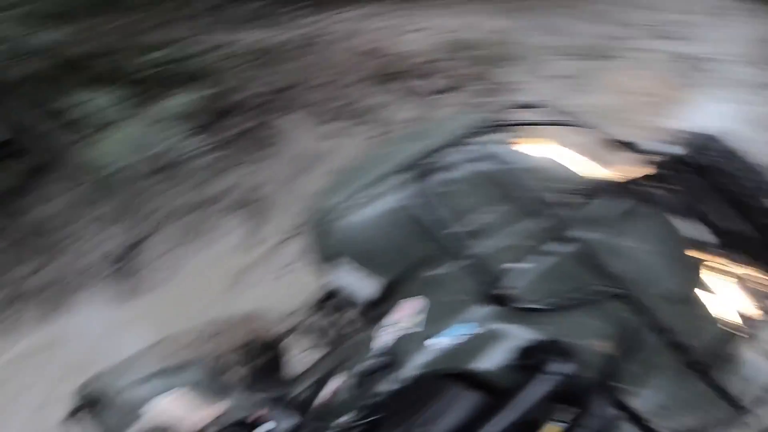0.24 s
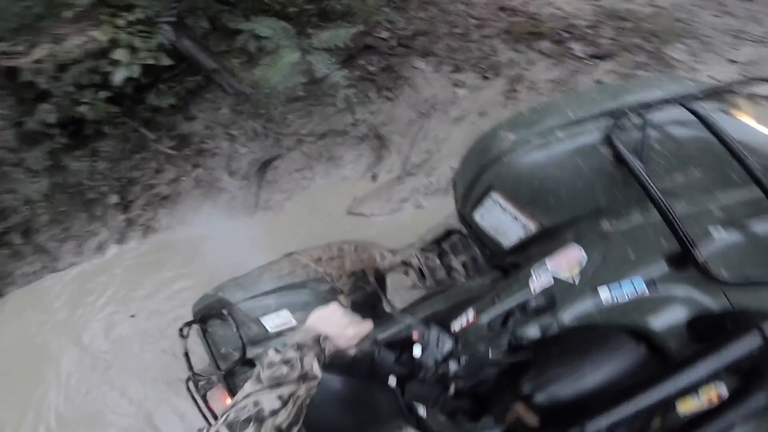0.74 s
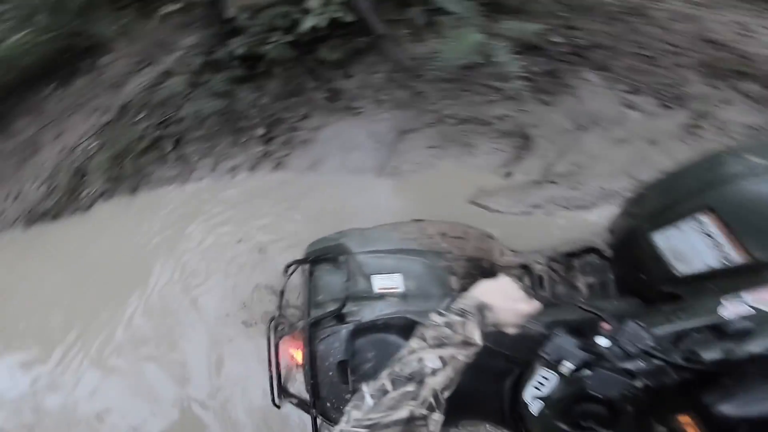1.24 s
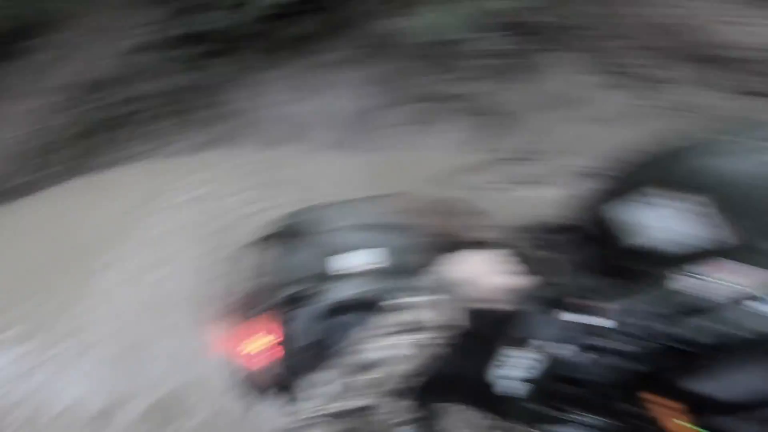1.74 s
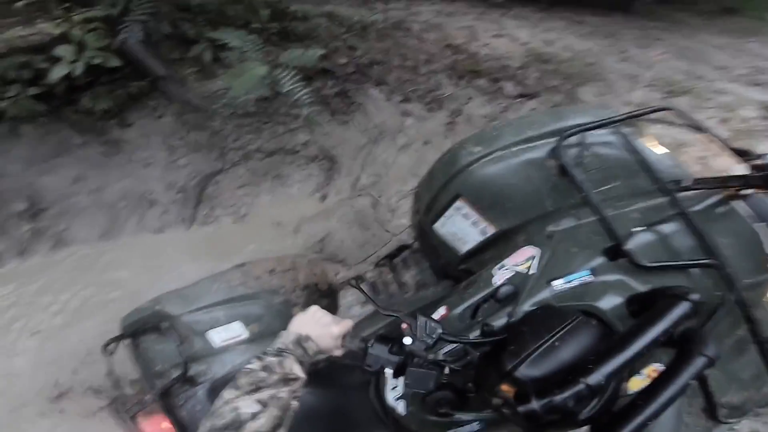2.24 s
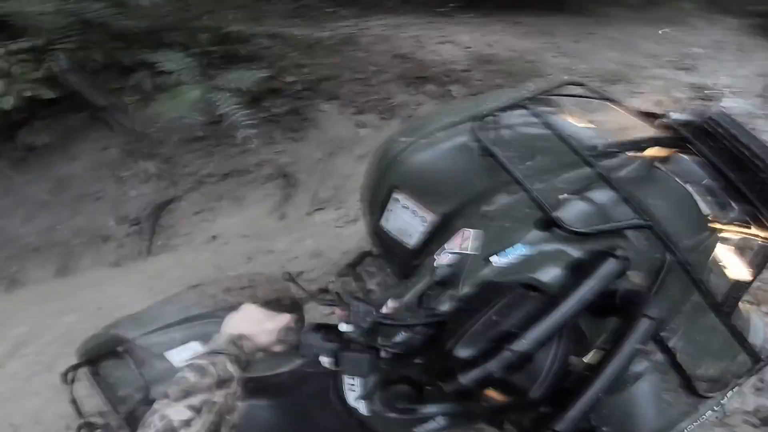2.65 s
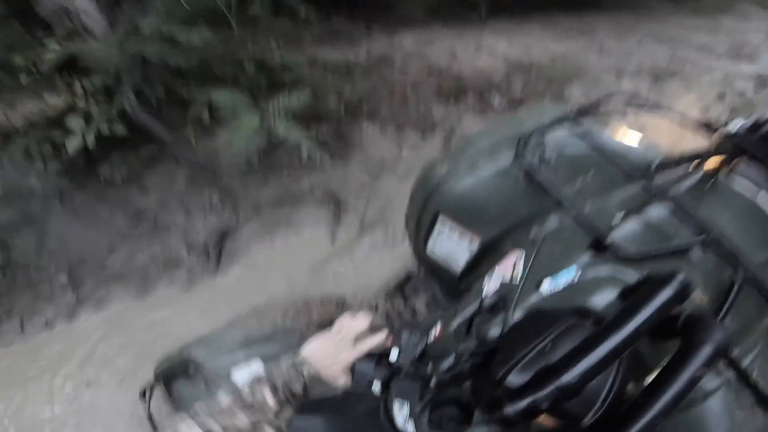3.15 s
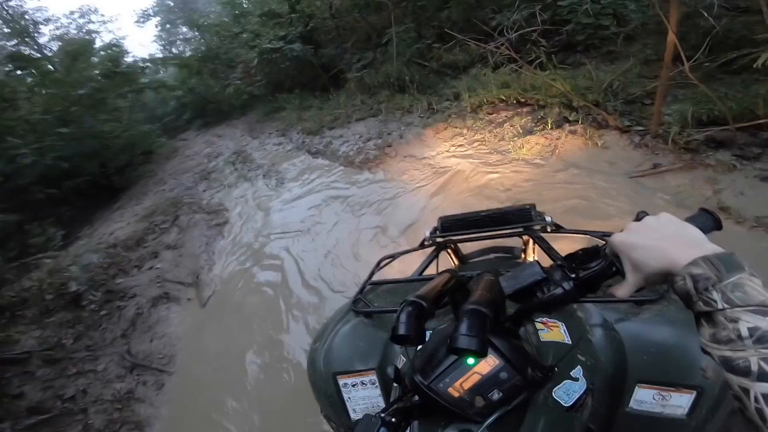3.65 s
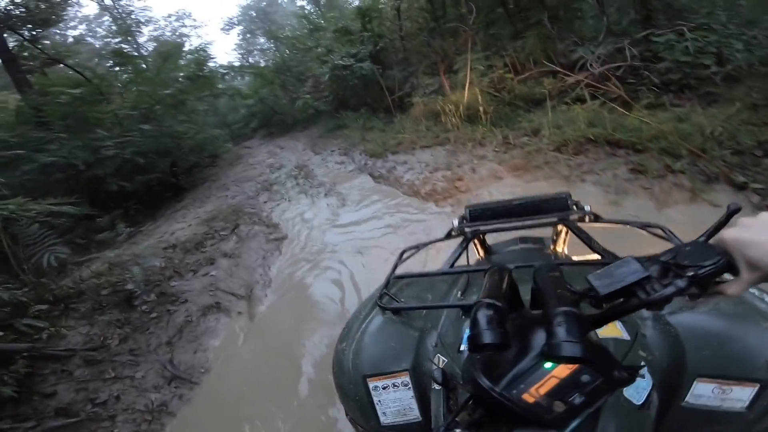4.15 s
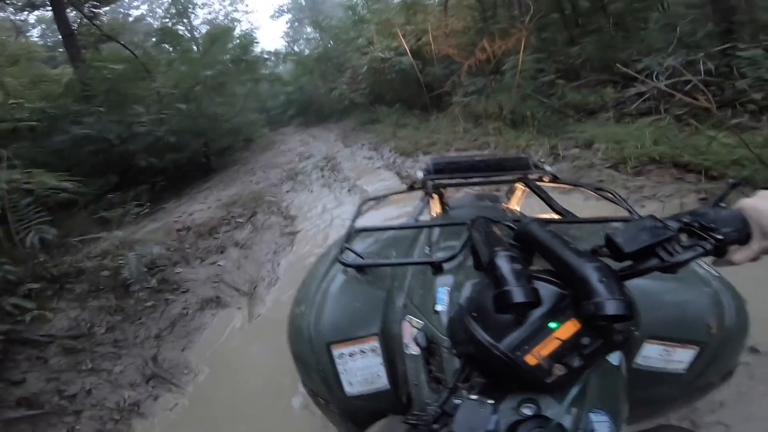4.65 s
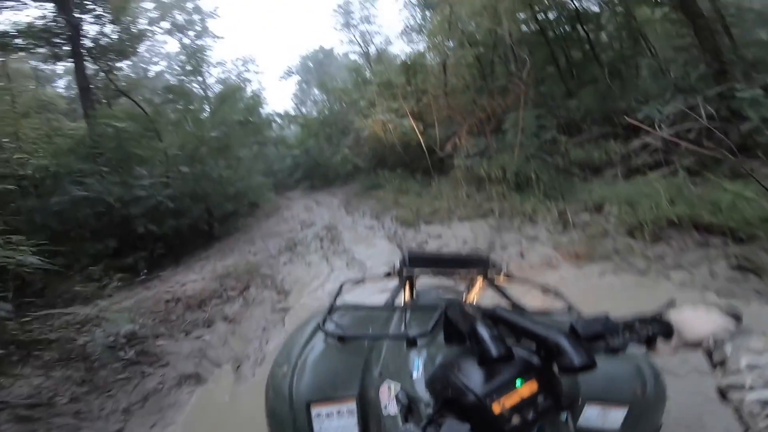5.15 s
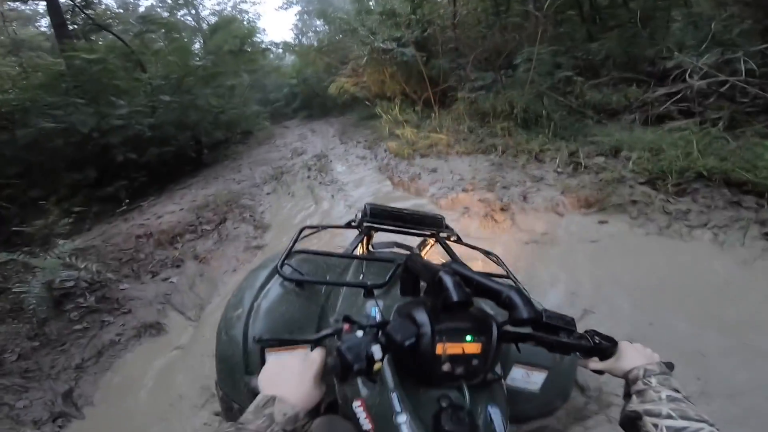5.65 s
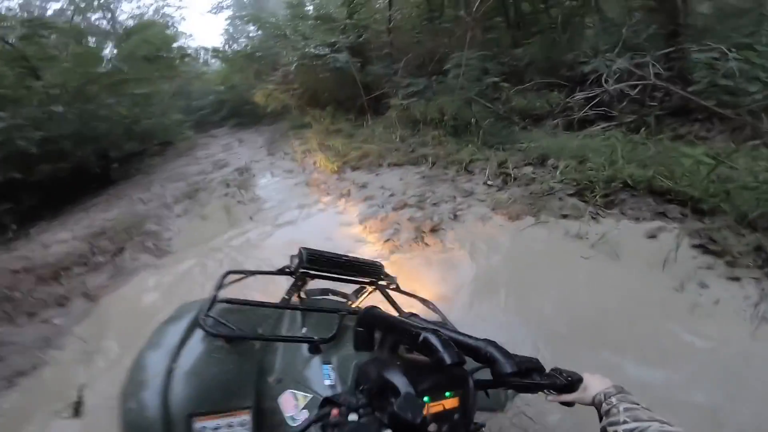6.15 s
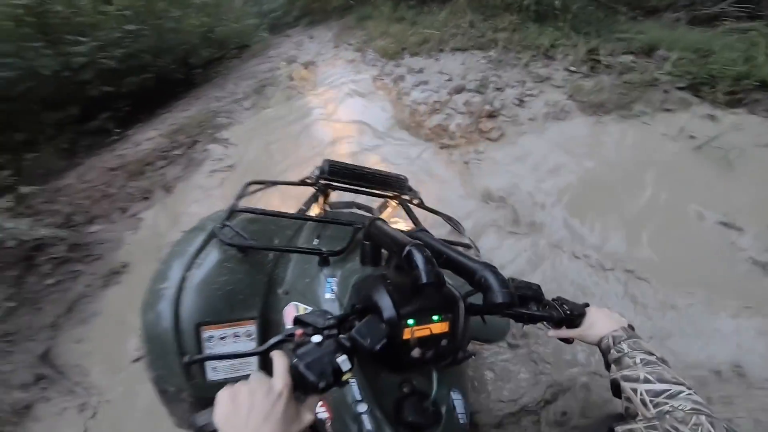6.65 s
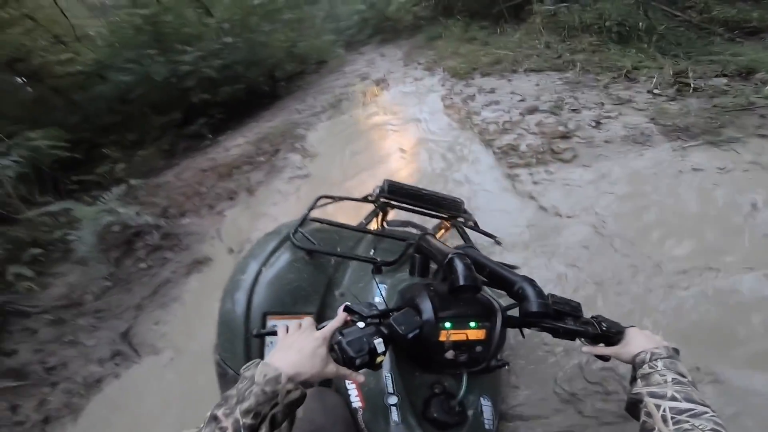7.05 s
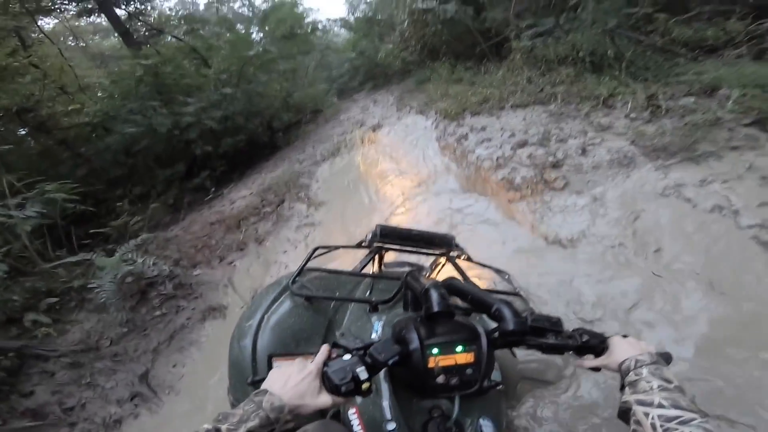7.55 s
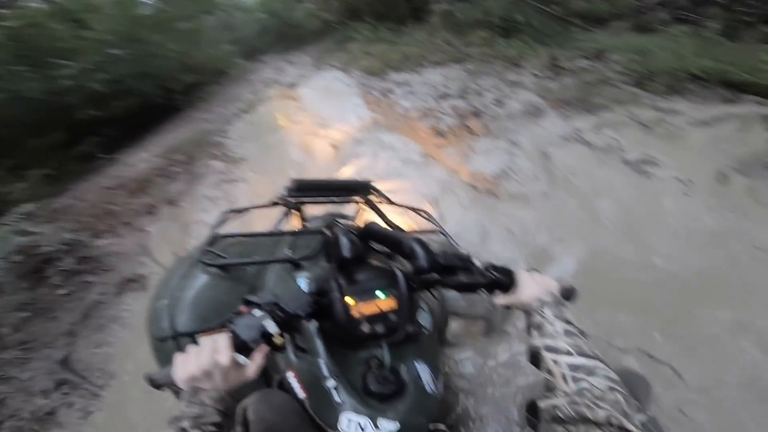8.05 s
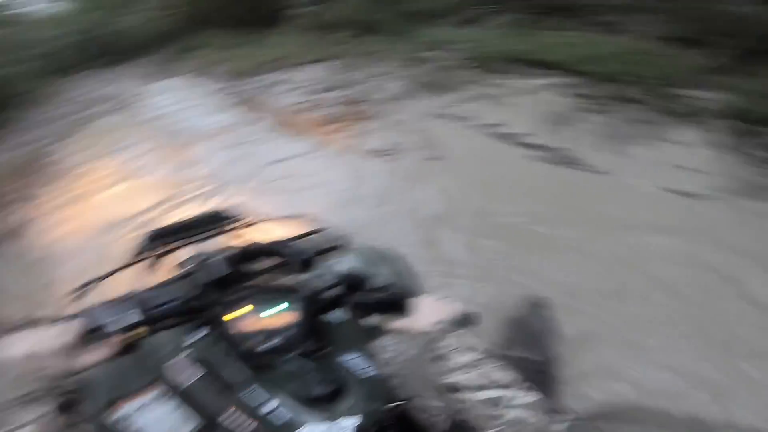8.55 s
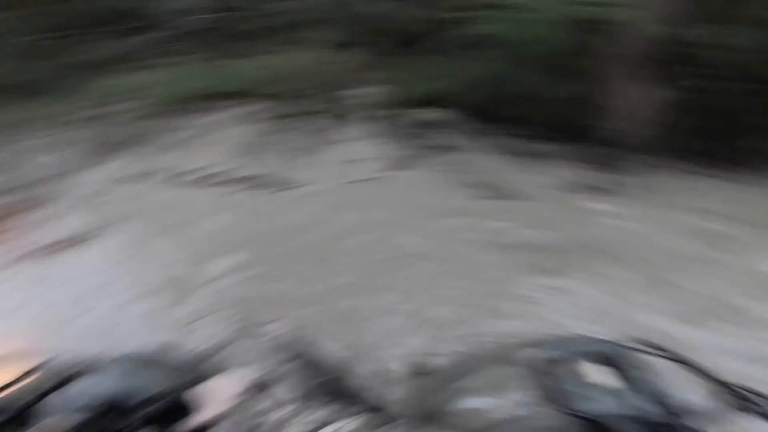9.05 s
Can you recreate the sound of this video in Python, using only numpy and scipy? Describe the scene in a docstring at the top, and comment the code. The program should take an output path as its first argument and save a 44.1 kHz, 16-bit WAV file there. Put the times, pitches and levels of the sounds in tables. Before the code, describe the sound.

Close single-cylinder engine pulses surge, gurgle and idle as a quad works through a flooded rut, with wet slaps and small clicks.

```python
"""A single-cylinder quad creeps through a flooded mud rut, heard close up from the rider's helmet in stereo.
First, head turned, the exhaust: every firing is one thump, barking under throttle, then limping and gurgling
at the waterline. As the head turns forward the intake snorkel takes over, barking on short pushes, then idling
until a last push. Each firing rings pipe resonances and gates bursts of noise. Throughout, coloured noise and
tiny tones make the muddy water at the wheels; decaying sines and noise make the valves and selector clicks."""
import sys
import numpy as np
from scipy import signal
from scipy.fft import rfft, irfft, next_fast_len
from scipy.io import wavfile
from scipy.ndimage import map_coordinates

SR = 44100
rng = np.random.default_rng(int(sys.argv[2]) if len(sys.argv) > 2 else 0)


def to_wav(s):
    """Save 16-bit WAV."""
    ch = np.atleast_2d(s).T  # columns
    pcm = np.round(np.clip(ch, -1, 1) * 32767)  # PCM
    wavfile.write(sys.argv[1], SR, pcm.astype(np.int16))


N = 410130

# engine speed before late firings: time_s, firings_per_s
SPEED = [(0, 18.11), (0.63, 17.82), (2.09, 26.63), (2.31, 15.66), (2.79, 10.79), (3.58, 12.68),
         (3.73, 22.26), (4.18, 24.53), (4.38, 15.38), (4.57, 21.44), (4.74, 17.19), (5.09, 23.51),
         (5.29, 21.42), (5.39, 15.02), (6.36, 11.07), (7.74, 11.77), (7.78, 15.88), (8.0, 18.54),
         (8.65, 19.42), (9.3, 17.4)]
# which pipe the helmet hears: time_s, exhaust_share (1 exhaust, 0 snorkel)
FACING = [(0, 0.95), (2.1, 0.92), (2.25, .8), (3.55, 0.82), (3.7, 0.025)]
# pushes on the thumb throttle: start_s, end_s, release_s, throttle_at_start (0-1), throttle_at_end (0-1)
PUSHES = [(-.1, 2.125, .08, .5, 1), (3.09, 3.65, .05, .2, .27), (3.655, 4.205, .04, .88, 1),
          (4.435, 4.62, .05, .6, .72), (4.8, 5.16, .045, .62, .78), (7.68, 8.85, .75, .43, .35)]
# firings that may be poor: time_s, level_db (below 0 also fires late)
MISFIRES = [(.158, 0), (.496, -1.5), (2.226, -8), (2.408, -11.5), (2.894, -3), (3.566, 0), (5.49, -9)]
# firing strength at idling speed: throttle (0-1), boom_db, honk_db, bark_db, rasp_db, hiss_db
EXHAUST_LOAD = [(0, -23.5, -38, -42.5, -54, -66.5), (.55, -19.5, -27, -39.5, -51, -63),
                (.8, -19.5, -27.5, -35, -45, -53), (1, -18.5, -30.5, -36, -46.5, -51)]
SNORKEL_LOAD = [(0, -24.5, -46, -61, -64, -69.5), (.17, -24, -54.5, -60, -68, -64),
                (.42, -22.5, -38.5, -56, -58, -59), (.7, -22, -37.5, -43.5, -46, -54),
                (1, -23, -43.5, -34, -43, -50.5)]
# what a doubling of engine speed adds: boom_db, honk_db, bark_db, rasp_db, hiss_db
REV_DB = (2.14, 7.95, 7.4, 0.45, 2.1)
# pipe resonances, throttle shut and open: pitch_hz, width_hz (7 dB below the peak), level_db (on the firing)
EXHAUST_SHUT = [(56, 19, -11.5), (112.5, 79, -1.5), (167, 45, -0.5), (229, 57, -5.5), (275, 41, -5),
                (346.7, 65, -7.5), (431.3, 29.8, 0.5), (523, 61, -14.5), (662, 45, -16.5)]
EXHAUST_OPEN = [(55, 25, -18), (116, 61, -2.5), (151.3, 76, 0.5), (239.5, 95, -2), (303.3, 53, -4.5),
                (468, 60, -4), (525.5, 77, -2), (722, 78, -15.5)]
SNORKEL_SHUT = [(72.38, 26.7, -2), (106.2, 41, -3), (143.5, 49.3, -1.5), (203, 15, 0), (347, 100, -11.5),
                (490, 190, -9.5), (710, 880, -15.5)]
SNORKEL_OPEN = [(98.5, 41.3, -3), (128.1, 43, -1), (167.8, 54.6, -5.5), (231.7, 58, 0.5), (333.7, 58, -10),
                (461.5, 155, -2.5), (561, 44, -17), (730, 210, -19.5)]
# how far each pipe rings as if open: throttle (0-1), open_share (0-1)
EXHAUST_OPENS = [(.67, 0), (.76, 0.99)]
SNORKEL_OPENS = [(.02, 0.023), (.12, 0.95)]
# bodywork buzzing with the firings: pitch_hz, width_hz (7 dB below the peak), level_db (on BUZZ)
PANELS = [(380.7, 39, -3), (681, 55, -1), (810, 68, -7), (1142, 110, -6), (2020, 360, -15.5)]
# buzz before the throttle acts on it: time_s, low_mode_db, middle_pair_db, high_pair_db
BUZZ = [(0, -70, -72, -55), (1.5, -49, -56, -61), (4.1, -50, -69, -57.5), (4.6, -40.5, -57, -60),
        (5.15, -42.5, -51, -63), (7.75, -65, -54.5, -46.5), (8.2, -40, -58.5, -52.5),
        (8.7, -39, -50.5, -56), (9.3, -50.5, -51, -62)]
# the buzz dies as the throttle shuts: throttle (0-1), gain_db
BUZZ_LOAD = [(0, -21), (.3, 0.5)]
# colours of the gas noise: pitch_hz, relative_level_db
ROAR = [(150, -25.5), (280, -3), (450, -1.5), (620, 1.5), (850, -6.5), (1200, -21.5), (2500, -53.5)]
RASP = [(300, -18), (700, 3.5), (1300, 7), (2000, 0.5), (3300, -7), (4500, -34), (9000, -43.5)]
HISS = [(1500, -11), (3300, 7), (4900, 2.5), (6400, 7.5), (7700, 1.5), (8500, -6.5), (10500, -13),
        (13500, -18), (16000, -25)]
# ringing metal of the valve gear and the gear selector: pitch_hz, relative_level_db, t60_s
VALVES = [(3400, -33.5, .02), (6400, -14, .02), (7400, -6.5, .03), (7400, -3, 0.032), (10850, -29.5, 0.048)]
SELECTOR = [(3650, -7, 0.038), (5100, -0.5, 0.017), (6830, -3.5, 0.021), (7620, -3.5, 0.053),
            (9900, -19.5, 0.014), (10660, -12, 0.069)]
# sharp clicks of the controls: time_s, relative_level_db
CLICKS = [(3.432, -30.5), (3.452, -49), (6.805, -37.5), (7.317, -48.5), (7.693, -19.5)]
# churning water at the wheels: time_s, relative_level_db
WASH = [(0, -48.5), (.8, -46.5), (1.5, -50), (2.05, -44), (2.55, -44), (2.95, -55.5), (3.2, -45),
        (3.5, -47), (3.75, -44.5), (4.8, -49), (5.3, -46.5), (6.05, -51), (6.4, -42), (6.77, -44.5),
        (6.9, -49.5), (7.4, -56.5), (7.6, -53), (7.9, -53), (9.3, -52.5)]
# slaps of mud and water: time_s, level_db, centre_hz, t60_s
SLAPS = [(3.15, -42.5, 1990, 0.31), (3.211, -34.5, 2830, 0.1), (3.226, -28.5, 1570, 0.057),
         (3.335, -41.5, 1680, 0.5), (3.384, -43, 3170, 0.15), (5.667, -32.5, 637, 0.043),
         (6.121, -40, 2690, .1), (6.35, -46.5, 800, 0.22), (6.45, -39.5, 1320, 0.16),
         (6.744, -46.5, 4480, 0.25), (7.559, -45.5, 2340, 0.13)]
# colours of the water and of the moving machine: pitch_hz, relative_level_db
SLOSH = [(80, -9), (250, 21), (450, 15), (700, 5), (1000, 1), (1500, 0), (2300, -4), (3400, -5.5),
         (5000, -19), (9000, -54.5)]
SPRAY = [(1800, -4.5), (3600, 1.5), (4900, -4), (6400, 3), (7700, -1), (8500, -7), (10500, -14.5),
         (11500, -20.5), (14000, -17), (16000, -28)]
RUMBLE = [(10, 1.5), (30, 13.5), (55, -21), (100, -6.5), (250, -32), (600, -60.5)]
# likeness of the two ears for the spread sources: pitch_hz, correlation (0-1)
ALIKE = [(60, .99), (250, .99), (500, .85), (1000, .7), (2000, .65), (4000, .35), (8000, .15), (14000, .3)]
# stereo balance with the head turned and facing ahead: pitch_hz, left_minus_right_db
TURNED = [(60, 2), (110, -1), (200, -1.0), (380, -3.5), (700, -7), (1290, -3), (2380, 0.5), (4400, 0.5),
          (8120, -1.5), (15000, -2)]
AHEAD = [(60, -2), (110, 1.5), (200, -3), (380, -2.5), (700, -10), (1290, -8), (2380, -6), (4400, 0),
         (8120, -7), (15000, 2.5)]

TOP_HZ = 15800
IDLE_RATE, START_TURN = 11.5, .215  # firings per second; share of the first cycle already run
PUSH_RISE_S, MISFIRE_LATE_S = 0.046, .006
# limping with a drowned tailpipe: below this many firings per second, every second one is late and weak
LIMP_BELOW_RATE, LIMP_S, LIMP_DB, LIMP_GURGLE = 16, .004, 1.5, .5
# spread of the gas bursts: the wet tailpipe sputters, the snorkel draws evenly
EXHAUST_SPUTTER_DB, SNORKEL_SPUTTER_DB = 2.6, 1.3


def firings():
    """Times of the firings (s) and the length of each cycle (samples), one firing per whole turn."""
    rate, = at(SPEED)
    turns = START_TURN + np.cumsum(rate) / SR
    times = np.interp(np.arange(int(turns[-1]) + 1), turns, np.arange(N) / SR)
    times = times + LIMP_S * limp(times) + MISFIRE_LATE_S * (misfires(times) < 0)
    return times, SR / at(SPEED, times)[0]


def throttle(s):
    """Throttle 0-1 at times s: each push rises, leans in or eases off, and is let go."""
    pushes = []
    for start, end, release, first, last in PUSHES:
        lean = np.interp(s, [start, end], [first, last])
        held = np.clip(np.minimum((s - start) / PUSH_RISE_S, 1 - (s - end) / release), 0, 1)
        pushes.append(lean * held)
    return np.clip(np.max(pushes, axis=0), 0, 1)


def limp(times):
    """Toward +1 for the weak and -1 for the strong firings of a labouring engine, else 0."""
    slow = np.clip((LIMP_BELOW_RATE - at(SPEED, times)[0]) / (LIMP_BELOW_RATE - IDLE_RATE), 0, 1)
    return slow * at(FACING, times)[0] * (-1) ** np.arange(len(times))


def misfires(times):
    """Level change in dB of each firing, 0 or below: a poor burn is weak."""
    change_db = np.zeros(len(times))
    for s, db in MISFIRES:
        change_db[np.argmin(np.abs(times - s))] = db
    return change_db


def exhaust_share(s=None):
    """Share of the exhaust against the snorkel at the helmet, 0-1."""
    return np.clip(at(FACING, s)[0], 0, 1)


def strength(times):
    """Boom, honk, bark, rasp and hiss of each firing in dB, from throttle, speed and the pipe that is heard."""
    load, rear = throttle(times), exhaust_share(times)
    loaded = rear * np.array(at(EXHAUST_LOAD, load)) + (1 - rear) * np.array(at(SNORKEL_LOAD, load))
    revved = np.outer(REV_DB, np.log2(at(SPEED, times)[0] / IDLE_RATE))
    boom, honk, bark, rasp, hiss = loaded + revved + misfires(times)
    return boom - LIMP_DB * limp(times), honk, bark, rasp, hiss


def pipes(times, period, exhaust_lead=0.00252, snorkel_lag=.001, gurgle=0.47, exhaust_db=0, snorkel_db=3):
    """Each firing rings exhaust, snorkel and bodywork; the throttle changes the pipe resonances."""
    boom, honk, bark = strength(times)[:3]
    load = throttle(times)
    level_db = lambda hz: boom if hz < 200 else honk if hz < 390 else bark
    buzz_db = lambda hz: at(BUZZ, times)[np.searchsorted([500, 1000], hz)] + at(BUZZ_LOAD, load)[0]
    opening = np.clip(at(EXHAUST_OPENS, load)[0], 0, 1)[:, None]
    intake = np.clip(at(SNORKEL_OPENS, load)[0], 0, 1)[:, None]
    rear = exhaust_share(times)[:, None]
    exhaust = ((1 - opening) * resonate(EXHAUST_SHUT, level_db, detune=0.028, scatter_db=0.97)
               + opening * resonate(EXHAUST_OPEN, level_db, detune=0.033, scatter_db=1.5))
    snorkel = ((1 - intake) * resonate(SNORKEL_SHUT, level_db, detune=0.017, scatter_db=0.67)
               + intake * resonate(SNORKEL_OPEN, level_db, detune=0.0087, scatter_db=.4))
    # strong puffs blow the water clear, weak ones gurgle
    shrink = gurgle * (1 - 0.77 * opening) * (1 + LIMP_GURGLE * limp(times)[:, None])
    exhaust = bubbled(exhaust, shrink, bubble_s=0.007245)
    # the exhaust valve bursts open, the intake stroke draws gradually
    exhaust = thumps(exhaust, abrupt=.75, drag_s=.0055) * np.sqrt(rear)
    snorkel = thumps(snorkel, abrupt=.55, drag_s=.0045) * np.sqrt(1 - rear)
    panel_power = resonate(PANELS, buzz_db, detune=0.022, scatter_db=1.5)
    panels = thumps(panel_power, abrupt=0.72, drag_s=0)
    # longer cycles get larger thumps, so speed alone leaves the power unchanged
    size = np.sqrt(period)[:, None]
    start = times - exhaust.shape[1] / 4 / SR
    return (amp(exhaust_db) * place(start - exhaust_lead, exhaust * size)
            + amp(snorkel_db) * place(start + snorkel_lag, snorkel * size) + place(start, panels * size))


def resonate(modes, level_db, detune, scatter_db, size=4096):
    """Power spectrum of each firing in a body whose resonances shift a little every time."""
    hz = np.fft.rfftfreq(size, 1 / SR) + 1
    power = 0
    for centre, width, db in modes:
        level = level_db(centre)
        shift, swell = rng.standard_normal((2, len(level), 1))
        c = centre * np.exp(detune * shift)
        skirt = 1 + .75 * ((hz - c * c / hz) / width) ** 2
        shape = 1 / (skirt * skirt * skirt)
        gain = amp(level[:, None] + db + scatter_db * swell)
        power = power + shape / shape.sum(1, keepdims=True) * gain ** 2
    return power


def bubbled(power, shrink, bubble_s):
    """The drowned tailpipe splits each puff into three shrinking bubbles of the same total energy."""
    hz = np.linspace(0, SR / 2, power.shape[1])
    gap, share = rng.uniform(.6, 1.3, (2, len(power), 1))
    echo = np.clip(shrink * share, 0, .9) * np.exp(-2j * np.pi * hz * bubble_s * gap)
    split = power * np.abs(1 + echo + echo ** 2) ** 2
    return split * power.sum(1, keepdims=True) / split.sum(1, keepdims=True)


def thumps(power, abrupt, drag_s, drag_hz=220):
    """Pulses with these power spectra, a quarter into their rows; abrupt 1 = a pop, 0 = a symmetric swell."""
    size = 2 * (power.shape[1] - 1)
    # folding the cepstrum forward moves the energy after the onset
    cepstrum = irfft(np.log(power * size / 2 + 1e-9) / 2)
    cepstrum[:, 1:size // 2] *= 1 + min(abrupt, 1)
    cepstrum[:, size // 2 + 1:] *= 1 - min(abrupt, 1)
    # the bass trails the bright front by up to drag_s, so a dragged thump sweeps downward
    trail = 2 * np.pi * drag_s * drag_hz * (1 - np.exp(-np.fft.rfftfreq(size, 1 / SR) / drag_hz))
    return np.roll(irfft(np.exp(rfft(cepstrum) - 1j * trail)), size // 4, axis=1)


def gas(times, period, rise_s=0.0012, crack_s=0.0022, tail_s=0.012, gulp_s=0.011, gulp_width_s=0.0099,
        gulp_rise_s=0.0037, roar_db=-11, rasp_db=0, hiss_db=0):
    """Turbulence: a crack and a tail from the exhaust, a rounder gulp from the snorkel."""
    t = np.arange(SR // 16) / SR
    crack = 1.5 * rng.exponential(size=(len(times), 1))
    blow = (1 - np.exp(-t / rise_s)) ** 2 * (crack * np.exp(-t / crack_s) + np.exp(-t / tail_s))
    blow = blow / np.linalg.norm(blow, axis=1, keepdims=True)
    gulp = np.exp(-((t - gulp_s) / gulp_width_s) ** 2 / 2) * (1 - np.exp(-t / gulp_rise_s))
    gulp = gulp / np.linalg.norm(gulp)
    rear = exhaust_share(times)[:, None]
    burst = rear * blow + (1 - rear) * gulp
    sputter_db = np.interp(rear[:, 0], [0, 1], [SNORKEL_SPUTTER_DB, EXHAUST_SPUTTER_DB])

    def gate(db):
        """Level curve of one noise: a burst per firing, each with its own random strength."""
        gain = amp(db + sputter_db * rng.standard_normal(len(times))) * np.sqrt(period)
        return place(times - .003, burst * gain[:, None])

    bark, rasp, hiss = strength(times)[2:]
    flutter = amp(1.32 * wobble(500))
    roar_noise = gate(bark + roar_db) * noise(ROAR)
    rasp_noise = gate(rasp + rasp_db) * noise(RASP)
    hiss_noise = gate(hiss + hiss_db) * noise(HISS)
    return roar_noise + flutter * (rasp_noise + hiss_noise)


def metal(times, period, valve_db=-62, valve_rev_db=9, behind_db=-10, click_db=-9):
    """Valves seat twice a cycle, harder with speed, fainter with the head turned; the controls click."""
    seats = np.concatenate([times + 0.26 * period / SR, times + 0.88 * period / SR])
    force_db = valve_rev_db * np.log2(at(SPEED, seats)[0] / IDLE_RATE) + behind_db * at(FACING, seats)[0]
    seat_db = valve_db + force_db + 3 * rng.standard_normal(len(seats))
    s, db = np.transpose(CLICKS)
    return np.array([taps(seats, seat_db, VALVES, crack=0.5, crack_t60=0.004)
                     + taps(s, db + click_db, SELECTOR, crack=1.54, crack_t60=.025) for ear in range(2)])


def taps(times, db, modes, crack, crack_t60):
    """Metal contacts: a short noise crack and a ring with new strengths each time."""
    t = np.arange(SR // 10) / SR
    draw = lambda: rng.standard_normal((len(times), 1))
    ring = 0
    for hz, level, t60 in modes:
        decay = amp(level + 1.4 * draw() - 60 * t / t60)
        ring = ring + decay * np.sin(2 * np.pi * (hz * t + draw()))
    bright = signal.butter(2, [2000, 10000], "bandpass", fs=SR, output="sos")
    snap = crack * amp(-60 * t / crack_t60) * signal.sosfilt(bright, rng.standard_normal(ring.shape))
    return place(times, (ring + snap) * amp(db)[:, None])


def water(slosh_db=2, spray_db=-10.5, fling_db=8, bubble_db=-2, surge_db=2):
    """The wheels churn the puddle and fling mud; each surge brings a cloud of bubbles."""
    slosh, = at(WASH)
    # under throttle the front wheels throw more spray
    spray = slosh + fling_db * throttle(np.arange(N) / SR) * (1 - at(FACING)[0])
    surge = surge_db * wobble(22)
    bubbles = np.array([drops(1600, centre_hz=1000, cycles=6, spread_db=2.5) for ear in range(2)])
    churn = amp(slosh_db) * noise(SLOSH) + amp(bubble_db + 1.2 * wobble(12)) * bubbles
    wash = amp(slosh + surge) * churn + amp(spray + spray_db + surge) * noise(SPRAY)
    for s, db, hz, t60 in SLAPS:
        t = np.maximum(np.arange(N) / SR - s, 0)
        band = [(hz / 4, -30), (hz / 2.6, 0), (hz * 1.47, -2), (hz * 4, -25), (hz * 10, -60)]
        slap = amp(db - np.minimum(60 * t / t60, 200)) * (1 - np.exp(-t / 0.00049))
        wash = wash + slap * noise(band)
    return wash


def drops(per_second, centre_hz, cycles, spread_db):
    """Bubbles and droplets: tiny rising, dying tones of rms 1 overall."""
    count, t = int(per_second * N / SR), np.arange(SR // 80) / SR
    hz = np.clip(centre_hz * np.exp(0.635 * rng.standard_normal((count, 1))), 300, 12000)
    age = hz * t / cycles
    rising = np.sin(2 * np.pi * hz * t * (1 + 0.047 * np.minimum(age, 3)))
    tone = np.exp(-age) * rising * (1 - t / t[-1])
    size = amp(spread_db * np.minimum(rng.exponential(size=(count, 1)), 4))
    return unit(place(rng.random(count) * N / SR, tone * size))


def rumble(rumble_db=-48.5, turned_db=6):
    """Low, uneven noise of the moving machine, stronger toward the rear."""
    heave_db = 4.1 * wobble(3.1)
    return amp(rumble_db + turned_db * at(FACING)[0] + heave_db) * noise(RUMBLE)


def amp(db):
    """Decibels to gain."""
    return 10 ** (np.asarray(db) / 20)


def unit(x):
    """Scale to rms 1."""
    return x / np.sqrt(np.mean(x ** 2) + 1e-20)


def along(points, hz):
    """(Hz, value) points read on a log axis."""
    f, v = np.transpose(points)
    return np.interp(np.log(hz + 1), np.log(f + 1), v)


def at(rows, s=None):
    """The columns of a curve at times s (default: every sample)."""
    knots, *cols = np.transpose(rows)
    return [np.interp(np.arange(N) / SR if s is None else s, knots, c) for c in cols]


def wobble(rate):
    """A smooth random curve, rate knots a second."""
    return map_coordinates(rng.standard_normal(int(N * rate / SR) + 4), [np.arange(N) * rate / SR])


def filtered(x, response):
    """x times a response of frequency."""
    m = next_fast_len(N + 8192)
    return irfft(rfft(x, m) * response(np.fft.rfftfreq(m, 1 / SR)), m)[..., :N]


def place(times, sounds):
    """Sum one short sound per row at its time."""
    index = np.round(np.asarray(times) * SR).astype(int)[:, None] + np.arange(sounds.shape[1])
    inside = (index >= 0) & (index < N)
    return np.bincount(index[inside], sounds[inside], N)


def noise(spectrum):
    """Two unrelated coloured noises of rms 1."""
    return unit(filtered(rng.standard_normal((2, N)), lambda hz: amp(along(spectrum, hz))))


def spread(pair):
    """Two unrelated signals become left and right, alike in the bass."""
    turn = lambda hz: np.arccos(np.clip(along(ALIKE, hz), 0, 1)) / 2
    mid, side = filtered(pair, lambda hz: np.array([np.ones_like(hz), np.tan(turn(hz))]))
    return np.array([mid + side, mid - side])


def scene():
    """All sources at the helmet; the left-right balance changes as the head turns."""
    times, period = firings()
    around = gas(times, period) + metal(times, period) + water() + rumble()
    sound = pipes(times, period) + spread(around)
    ears = lambda balance: filtered(sound, lambda hz: 2 / (1 + amp(np.outer([-1, 1], along(balance, hz)))))
    rear = exhaust_share()
    return rear * ears(TURNED) + (1 - rear) * ears(AHEAD)


def record(dry):
    """The helmet microphone passes nothing from its band limit up."""
    return filtered(dry, lambda hz: hz < TOP_HZ)


dry = scene()
out = record(dry)
to_wav(out)
```